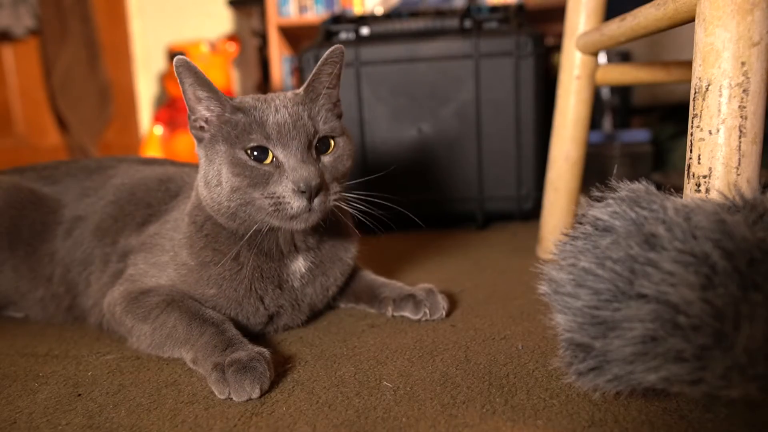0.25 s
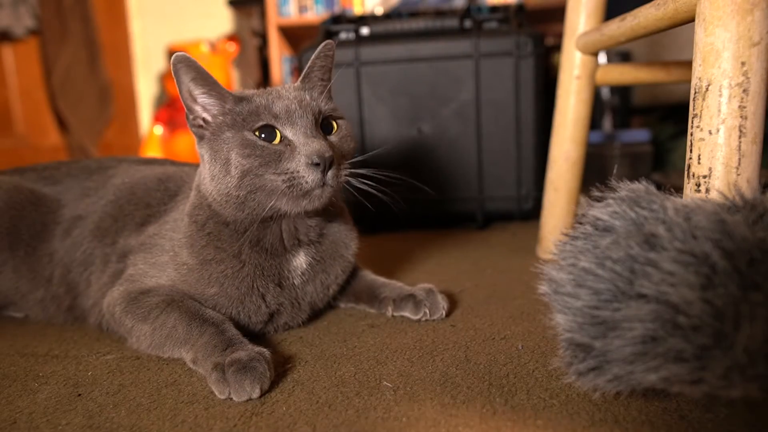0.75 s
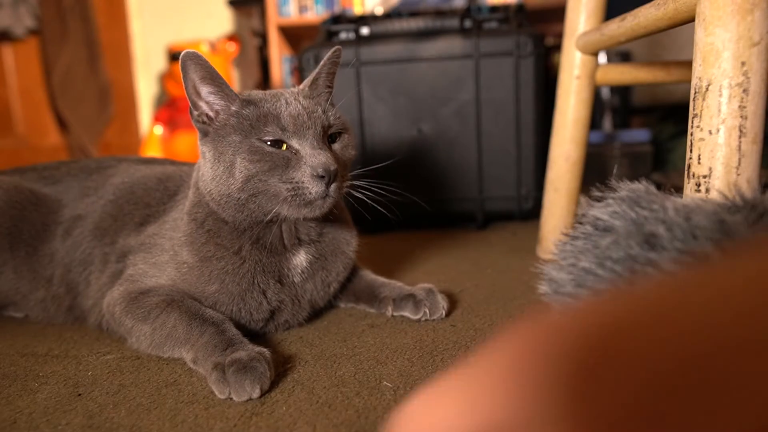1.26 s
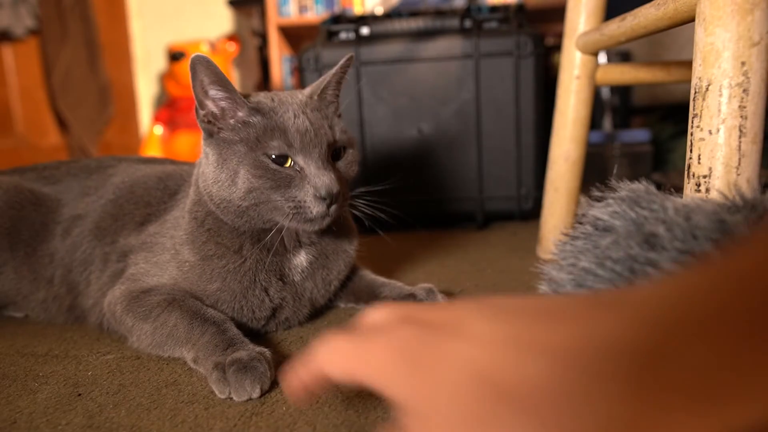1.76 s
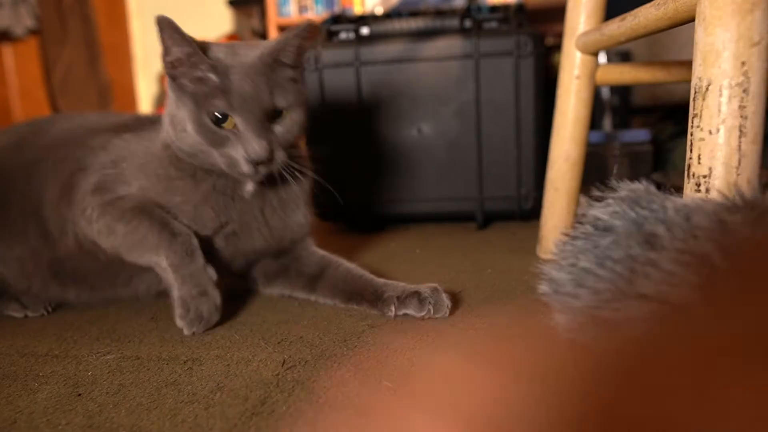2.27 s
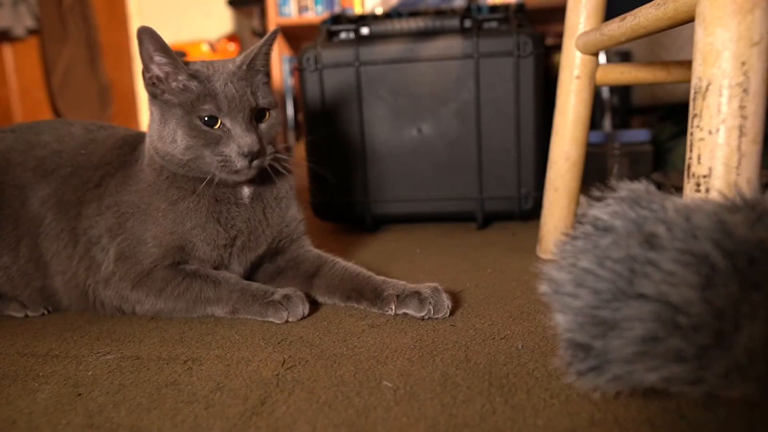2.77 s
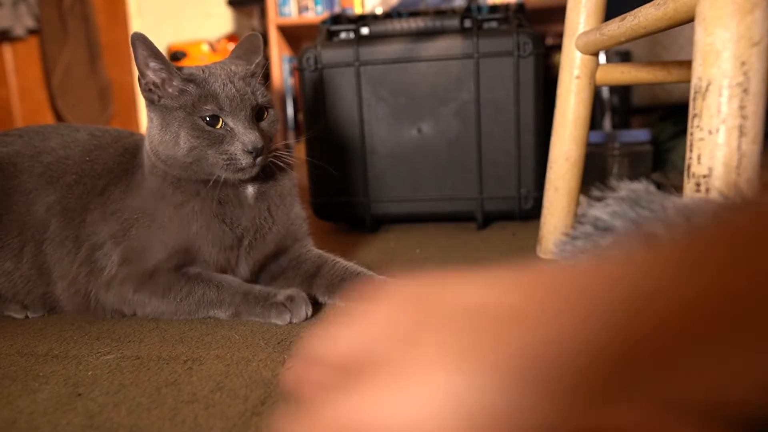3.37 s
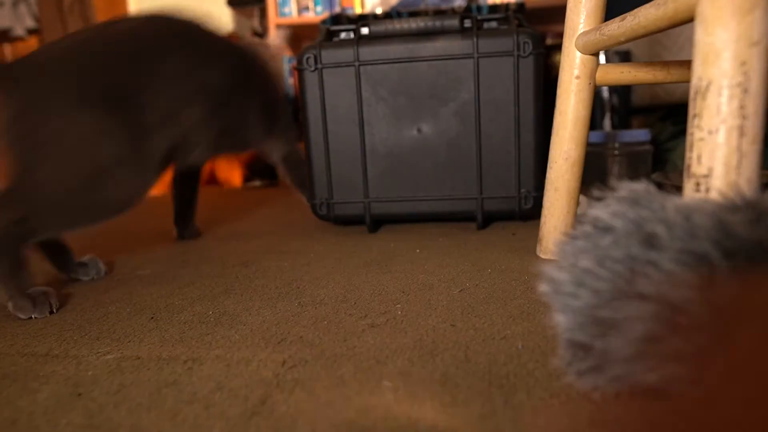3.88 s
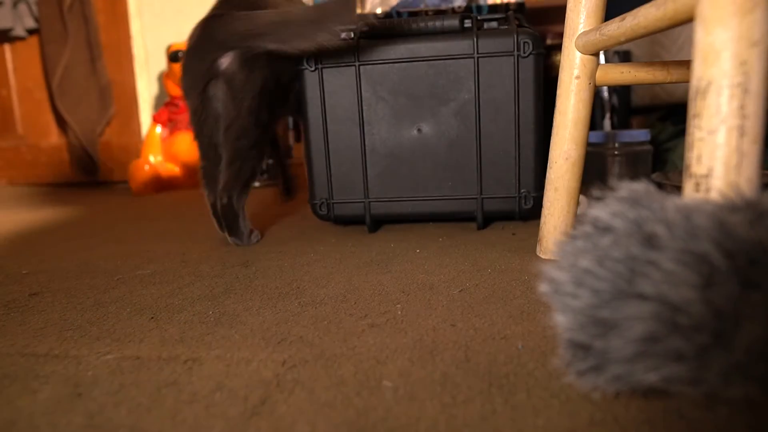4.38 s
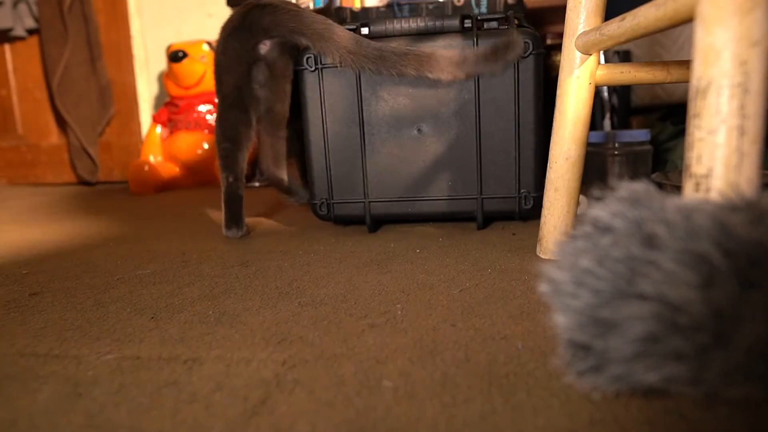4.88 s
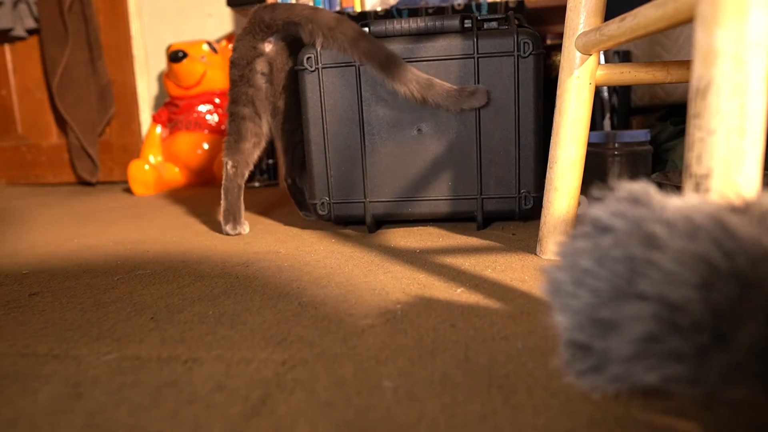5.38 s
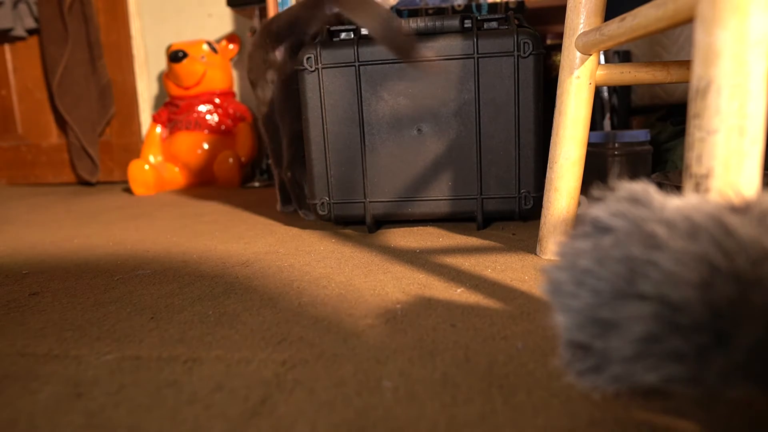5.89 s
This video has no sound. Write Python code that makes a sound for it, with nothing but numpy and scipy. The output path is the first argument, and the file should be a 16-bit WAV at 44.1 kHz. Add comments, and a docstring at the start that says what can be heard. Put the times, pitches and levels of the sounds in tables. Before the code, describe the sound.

A stereo microphone near the floor picks up a quiet carpeted room with faint, steady hiss. For the first second there are light, grainy brushes on the carpet and a couple of tiny ticks. Around 1.5 seconds a hand and a cat's paws rustle a little more, with soft low thumps in the floorboards. From 2 to 2.5 seconds come claw ticks, a falling swish and a soft thud. Louder swishes, ticks and thuds follow at about 3.4 to 3.7 seconds as the cat gets up. After faint shuffling, the busiest stretch runs from 4.6 to 5.3 seconds, with quick brushing steps, sharp little fibre snaps and low rumble as the cat pads away. At about 5.4 seconds the microphone stand takes one dull knock and wobbles briefly. A last soft swish comes on the left at around 6 seconds.

```python
"""A quiet carpeted room, heard by a stereo microphone near the floor. A hand and a cat's paws brush
the carpet in grainy swishes, and its ribs add a band of noise that glides with the stroke's speed.
Claws and caught fibres tick. Paws and palms land with soft thuds, and shifting weight booms in the
floorboards and shakes the microphone, whose stand is knocked once. Room tone and hiss lie under all."""
import sys
import numpy as np
from scipy import signal
from scipy.fft import rfft, irfft, next_fast_len
from scipy.io import wavfile
from scipy.ndimage import map_coordinates

SR = 44100
rng = np.random.default_rng(int(sys.argv[2]) if len(sys.argv) > 2 else 0)


def master(y):
    """Save y as 16-bit WAV."""
    cut = np.clip(np.atleast_2d(y).T, -1, 1)
    pcm = np.round(cut * 32767)  # scale
    wavfile.write(sys.argv[1], SR, pcm.astype(np.int16))


N = 270765

# Brush strokes: (start [s], rise [s], hold [s], pile [dB], loops [dB], fibres [dB], fur [dB],
# pan left [dB])
STROKES = [(.12, 0.086, 0.15, -69, -72, -81, -89, 12), (.56, 0.068, 0.095, -60.5, -67, -79, -91, 6.5),
           (.81, 0.045, .11, -68, -71, -70, -66.5, 9.5), (.87, .02, 0.042, -63, -66.5, -72, -72, 6),
           (1.37, 0.072, 0.1, -65.5, -61, -66, -78, 10), (1.455, .015, .015, -63, -65, -69, -80, 13),
           (1.53, 0.024, 0.09, -62.5, -57.5, -63, -69, 10), (2.03, 0.04, 0.0093, -58.5, -56, -67, -80, 1),
           (2.15, 0.017, .012, -58, -68, -63, -61.5, 1), (2.195, 0.027, 0.049, -60.5, -56, -61.5, -66, 1.5),
           (2.26, 0.071, 0.059, -67, -53.5, -59, -64, 5), (2.36, 0.026, 0.053, -62, -58.5, -58.5, -65, 8),
           (2.44, 0.011, 0.07, -69, -65.5, -63, -73, 9.5), (2.72, 0.082, 0.054, -66.5, -69, -77, -81, -2),
           (2.965, .02, 0.036, -75, -72, -90, -85, -1), (3.34, 0.045, .03, -62, -60.5, -71, -73, -0.5),
           (3.425, 0.016, 0.011, -55.5, -60, -60.5, -67, 1.5), (3.47, .01, 0.024, -60.5, -62, -67, -68, 2),
           (3.555, 0.018, 0.0069, -63.5, -62, -76, -85, -1),
           (3.61, 0.017, .085, -56.5, -57, -61, -65.5, 1.5), (3.635, 0.018, 0.024, -48, -56, -59.5, -72, 2),
           (4.57, 0.05, 0.037, -64, -66.5, -70, -67, -5), (4.66, 0.025, .045, -66, -62, -63, -61, -3.5),
           (4.73, 0.023, 0.033, -52, -54, -63, -64, -1), (4.775, 0.014, 0.05, -55, -55.5, -59.5, -62, -1.5),
           (4.855, 0.0066, 0.0072, -49.5, -63, -60, -72, -1), (4.885, .012, .03, -62, -57, -64, -70, 2),
           (4.945, 0.03, 0.038, -51.5, -61, -63, -64, 2.5), (5.01, 0.01, 0.017, -59, -60, -60, -52.5, -1),
           (5.04, 0.022, .03, -55.5, -70, -64.5, -62, -3),
           (5.09, 0.028, 0.035, -54.5, -59.5, -67, -60.5, -5),
           (5.13, 0.048, 0.029, -61, -53.5, -56, -58, -1.5), (5.29, 0.058, .025, -64, -72, -74, -82, 8),
           (5.8, 0.072, 0.051, -72, -74, -85, -72, -8), (6.0, 0.086, 0.057, -59.5, -62.5, -71, -95, 13.5)]
# Release as the contact lifts: (pile [dB/s], loops [dB/s], fibres [dB/s], fur [dB/s])
STROKE_RELEASE = [500, 600, 600, 600]
# Body of the coarse pile: (frequency [Hz], level [dB])
PILE_EQ = [(350, -51), (600, 1.5), (1200, -2), (2000, -5), (2800, -30.5)]
# Rasp of the tight loops: (frequency [Hz], level [dB])
LOOPS_EQ = [(1600, -4.5), (2300, 2), (3500, -2), (5000, -9.5), (6500, -65)]
# Sizzle of single fibres: (frequency [Hz], level [dB])
FIBRES_EQ = [(3800, -5.5), (5200, -2), (7000, -3.5), (9000, -4.5), (11000, -39)]
# Airy top of the fur: (frequency [Hz], level [dB])
FUR_EQ = [(7500, -45), (9300, 8.5), (12000, 7.5), (15800, -1)]
# Glides across the ribs, one list a stroke: (time [s], rib rate [Hz], level [dB])
RIB_GLIDES = [
    [(.14, 1700, -97), (.165, 1690, -61.5), (.2, 1940, -68), (.25, 1710, -57.5), (.29, 1280, -59.5),
     (.33, 900, -66), (.36, 750, -97)],
    [(2.27, 2610, -84), (2.3, 2350, -53.5), (2.34, 1560, -50.5), (2.385, 1140, -51), (2.42, 815, -55),
     (2.455, 607, -63), (2.48, 500, -95)],
    [(3.61, 1210, -80), (3.64, 1460, -49.5), (3.665, 1650, -46.5), (3.69, 1990, -51.5), (3.72, 1700, -73),
     (3.74, 1500, -101)],
    [(6.02, 1100, -76), (6.06, 1300, -61), (6.14, 1430, -51.5)],
]
# Claw and fibre ticks: (time [s], ring [dB], pitch [Hz], snap [dB], snap top [Hz], pan left [dB])
TICKS = [(.064, -51, 960, -52, 4000, 10), (0.867, -51, 1310, -41, 2840, -4),
         (.97, -65, 1500, -54, 2500, -1), (1.476, -54, 900, -42.5, 2730, 4), (1.6, -48, 700, -44, 2800, 2),
         (1.627, -51, 800, -51, 2700, 4), (1.645, -46, 1090, -50, 2760, 1),
         (2.165, -35, 1170, -52, 3280, 0), (2.174, -37, 955, -40, 2140, 0), (2.201, -48, 805, -44, 1500, 0),
         (2.384, -38.5, 590, -46, 2500, -1), (3.445, -55, 600, -41, 1800, -2),
         (3.477, -33.5, 900, -36.5, 3280, -7), (3.622, -45, 915, -49, 3000, 0),
         (3.648, -37, 1770, -39, 2470, -1), (3.662, -38, 520, -46, 2400, 1),
         (4.738, -34, 700, -50, 2400, -7), (4.753, -31, 620, -38, 2900, -6),
         (4.79, -34.5, 583, -42.5, 3400, -9), (4.861, -34, 1260, -41, 2280, 4),
         (4.8845, -34.5, 1600, -35, 5170, 2.5), (5.064, -41.5, 1160, -53, 2100, 9),
         (5.13, -37, 730, -47, 1500, -7), (5.152, -36, 533, -46, 1500, -13),
         (5.195, -43, 1080, -50, 3500, -14), (5.284, -49, 600, -65, 1500, -13),
         (5.355, -47, 526, -66, 1200, 12), (5.52, -46.5, 648, -68, 1500, -13)]
# Stereo image through the air: (frequency [Hz], left-right correlation [-1..1])
AIR_IMAGE = [(640, 0.85), (1500, 0.64), (3500, 0.53), (8000, 0.55), (15000, -0.69)]

# Weight shifts: (start [s], rise [s], hold [s], press [dB], main board [dB], other boards [dB],
# shake [dB], pan left [dB])
SHIFTS = [(0.14, 0.035, 0.075, -63.5, -59, -56, -51.5, 4), (0.299, 0.016, 0.015, -57.5, -53, -55, -47, 5),
          (0.465, 0.037, 0.015, -68, -71, -57, -65, 2), (0.573, .02, .03, -59, -70, -70, -63, -3),
          (0.637, 0.034, 0.063, -55.5, -55.5, -48, -61, 2.5),
          (0.861, 0.063, 0.011, -51.5, -53.5, -46.5, -49, -2.5),
          (1.368, 0.016, 0.036, -51.5, -40, -55, -49, 0.5),
          (1.459, 0.023, 0.029, -49.5, -52, -56, -55, -3.5),
          (1.517, 0.036, 0.082, -47, -50.5, -49.5, -60, -0.5), (1.57, 0.019, 0.022, -59, -43, -60, -62, 3),
          (1.635, 0.023, 0.036, -70, -52, -53.5, -65, -1), (2.024, 0.045, 0.024, -57, -59, -52, -52, 1.5),
          (2.15, 0.029, 0.055, -53.5, -49.5, -47, -48, -0.5),
          (2.267, 0.045, 0.053, -53, -52, -41.5, -46.5, 3.5), (2.397, .02, 0.043, -54.5, -61, -56, -51, 2),
          (2.478, .02, 0.011, -58.5, -65, -50, -62, -1), (3.374, 0.1, 0.01, -49.5, -50.5, -45, -43, 1),
          (3.559, 0.033, .02, -64, -60, -44.5, -47, 5), (3.63, 0.032, 0.042, -47.5, -49, -48, -42, -2.5),
          (3.716, 0.033, 0.051, -71, -56.5, -64, -47, -3), (4.13, 0.053, 0.046, -58.5, -68, -45, -58, 2.5),
          (4.277, 0.037, 0.026, -74, -66, -63, -56, -1), (4.41, .03, 0.046, -68, -65, -58, -55.5, -2),
          (4.661, 0.1, 0.076, -44.5, -60, -61, -69, -6), (4.849, 0.017, 0.016, -41, -62, -63, -48.5, 2),
          (4.887, .015, 0.042, -49.5, -70, -55, -41, -2), (4.958, 0.026, 0.064, -47, -50.5, -55, -48, -4),
          (5.045, 0.029, 0.013, -47, -55, -52, -55, -7), (5.106, 0.024, 0.07, -42.5, -51, -48, -48, -6.5),
          (5.269, 0.036, 0.032, -60, -55, -40.5, -40.5, 3.5), (5.336, 0.011, 0.022, -50, -49, -45, -39, 4),
          (5.378, .015, .015, -58, -50, -57, -38.5, 0), (5.42, .03, 0.059, -69, -73, -68, -44, 9),
          (5.545, 0.038, .35, -66.5, -78, -81, -50, 5), (5.824, 0.055, .1, -55.5, -69, -72, -58, -0.5),
          (6.0, 0.071, 0.089, -52, -70, -62.5, -59, 0.5)]
# Release as the floor settles: (press [dB/s], main board [dB/s], other boards [dB/s], shake [dB/s])
SHIFT_RELEASE = [350, 213, 236, 200]
# Muffled press of pads into the pile: (frequency [Hz], level [dB])
PRESS_EQ = [(150, -17), (200, 5.5), (300, 0), (450, 0.5), (650, -11), (900, -13), (1250, -37)]
# Strongest floor mode: (pitch [Hz], width [Hz], level [dB])
MAIN_BOARD = [(127.03, 10.1, 0)]
# Other floor modes: (pitch [Hz], width [Hz], level [dB])
OTHER_BOARDS = [(88.2, 18.2, 5), (173.8, 21.7, -0.5)]
# Rumble of the shaken microphone: (frequency [Hz], level [dB])
SHAKE_EQ = [(8, 10.5), (20, 5.5), (45, 5.5), (70, -5.5), (100, -46.5)]
# Stereo image through the boards: (frequency [Hz], left-right correlation [-1..1])
FLOOR_IMAGE = [(25, -0.23), (60, 0.13), (100, -0.07), (140, 0.63), (200, -0.65), (245, 0.39), (290, 0.39),
               (380, 0.012), (650, 0.66)]
# Soft landings: (time [s], level [dB], pitch [Hz], t60 [s])
THUDS = [(1.359, -43.5, 147, 0.16), (1.655, -45.5, 126, 0.21), (2.28, -32.5, 139, 0.073),
         (2.508, -37, 131, 0.038), (3.445, -30, 151, 0.046), (3.478, -32.5, 266, 0.097),
         (3.658, -28.5, 171, 0.066), (4.169, -42, 101, 0.17), (5.197, -27, 208, 0.03),
         (5.35, -29, 64, 0.066), (5.355, -27.5, 192, 0.032)]

# Faint restless shuffling between gestures: (time [s], level [dB])
SHUFFLE = [(0, -67), (.4, -65), (.8, -66), (1.2, -65.5), (1.75, -65), (2.0, -64), (2.6, -64), (2.9, -64.5),
           (3.2, -64), (3.75, -64), (4.0, -60.5), (4.3, -56.5), (4.6, -58.5), (5.25, -57.5), (5.5, -63.5),
           (5.7, -62.5), (5.95, -61), (6.14, -70)]
# Shuffling's send to the brush layers: (pile [dB], loops [dB], fibres [dB], fur [dB])
SHUFFLE_TO_BRUSH = [-7.5, -12.5, -18.5, -18]
# Shuffling's send to the floor: (press [dB], main board [dB], other boards [dB], shake [dB])
SHUFFLE_TO_FLOOR = [-0.58, -4.5, -3.1, 2.2]

# Envelope of the microphone's sway: (time [s], level [dB])
SWAY_LEVEL = [(0, -72), (.3, -61), (.5, -69), (.93, -54), (1.05, -70), (1.33, -66), (1.4, -65), (1.8, -66),
              (2.55, -100), (3.35, -78), (3.48, -69), (3.85, -69), (4.2, -61), (4.8, -59), (5.05, -45),
              (5.28, -61), (5.37, -58), (5.6, -65), (6.14, -58)]
# Sub-bass of that sway: (frequency [Hz], level [dB])
SWAY_EQ = [(8, -10), (25, 14), (60, 5), (85, -13), (102, -0.5), (120, -10), (150, -30)]
# Free swings of the knocked stand: (pitch [Hz], level [dB], t60 [s])
STAND_MODES = [(33, -25, .3), (24.5, -33, .95)]
# Decay of the wall reflections: (frequency [Hz], t60 [s])
WALL_DECAY = [(200, 0.1), (2000, 0.029), (10000, 0.055)]
# Room tone and hiss: (frequency [Hz], level [dB])
ROOM_EQ = [(12, -66), (20, -9.5), (58, -2), (81, -5.5), (119, -4.5), (192, -10.5), (335, -19), (456, -24),
           (713, -19), (843, -20.5), (1050, -24), (4370, -27.5), (15800, -30.5)]
# Stereo image of the room tone: (frequency [Hz], left-right correlation [-1..1])
ROOM_IMAGE = [(60, 0.52), (240, 0.24), (950, -0.25), (3770, -0.11), (15000, 0.097)]

OPPOSITE = np.array([[1], [-1]])  # left and right in opposite polarity


def strokes():
    """Skin and fur drag over the carpet: pile, loops, fibres and fur each hiss in their own range."""
    gains = gestures(STROKES, STROKE_RELEASE, SHUFFLE_TO_BRUSH, swell_db=11, sag_db_per_s=9)
    catch = amp(0.79 * wobble(240))  # fibres catch and slip together
    return sum(gain * spread(catch * grainy(500, depth_db=1.0), eq(colour), AIR_IMAGE)
               for gain, colour in zip(gains, (PILE_EQ, LOOPS_EQ, FIBRES_EQ, FUR_EQ)))


def ribs(width_octaves=0.45):
    """Ribs passing under a stroke sound a narrow band that follows its speed."""
    rib_hz, rib_db = curves(sum(RIB_GLIDES, []))
    friction = spread(grainy(200, depth_db=2.0), np.ones_like, AIR_IMAGE)
    hz, t, spectrum = signal.stft(friction, SR, nperseg=512)
    octaves = np.log2((hz[:, None] + 1) / np.interp(t, np.arange(N) / SR, rib_hz))
    band = np.exp(-(octaves / width_octaves) ** 2) / np.sqrt(hz[:, None] + 1)
    glide = signal.istft(spectrum * band, SR, nperseg=512)[1][:, :N]
    return panned(5.0)[:, None] * amp(rib_db) * unit(glide)


def ticks(ring_t60_cycles=15.5, snap_t60_s=0.024, click_gain=1.9):
    """A caught loop of carpet lets go: a short ring and a sharp broad snap."""
    out, t = np.zeros((2, N + SR)), np.arange(SR // 20) / SR
    for start, ring_db, hz, snap_db, top_hz, pan_db in TICKS:
        ring = amp(ring_db - 60 * t * hz / ring_t60_cycles) * np.sin(2 * np.pi * hz * t)
        burst = amp(-60 * t / snap_t60_s) * rng.standard_normal(len(t))
        band = signal.butter(4, [600, top_hz], "bandpass", fs=SR, output="sos")
        crackle = signal.sosfilt(band, burst + click_gain * (t == 0))
        snap = amp(snap_db) * crackle / np.abs(crackle).max()
        out[:, round(start * SR):][:, :len(t)] += panned(pan_db)[:, None] * (ring + snap)
    return out[:, :N]


def thuds(attack_s=0.00076, phase_rad=-0.58):
    """A paw or palm lands: one low push that rings briefly in the boards."""
    out, t = np.zeros((2, N + SR)), np.arange(SR // 2) / SR
    attack = 1 - np.exp(-t / attack_s)
    for start, db, hz, t60 in THUDS:
        tone = np.sin(2 * np.pi * hz * t + phase_rad * OPPOSITE)  # each capsule gets its own phase
        out[:, round(start * SR):][:, :len(t)] += amp(db - 60 * t / t60) * attack * tone
    return out[:, :N]


def weight_shifts(left_lead_s=7e-5):
    """Shifting weight presses the pile, sets the boards booming and shakes the capsules."""
    press = spread(grainy(90, depth_db=2.0), eq(PRESS_EQ), FLOOR_IMAGE)
    hum = spread(rng.standard_normal((2, N)), resonances(MAIN_BOARD), image=[(125, 0.38)])
    hum_envelope = np.abs(signal.hilbert(hum.mean(0)))
    hum = unit(hum / (hum_envelope + 1.44))  # soft compression: a driven board holds its level
    boom = spread(grainy(30, depth_db=2.0), resonances(OTHER_BOARDS), FLOOR_IMAGE)
    shake = spread(rng.standard_normal((2, N)), eq(SHAKE_EQ), FLOOR_IMAGE)
    gains = gestures(SHIFTS, SHIFT_RELEASE, SHUFFLE_TO_FLOOR, swell_db=12.5, sag_db_per_s=17.5)
    floor = sum(gain * layer for gain, layer in zip(gains, (press, hum, boom, shake)))
    # sound in the boards reaches the left capsule first
    return filtered(floor, lambda hz: np.exp(1j * np.pi * hz * left_lead_s * OPPOSITE))


def microphone_rocking(knock_s=5.357):
    """The stand sways, pushing one capsule and pulling the other, and swings out after a knock."""
    sway = unit(filtered(rng.standard_normal(N), eq(SWAY_EQ)))
    t = np.clip(np.arange(N) / SR - knock_s, 0, None)
    swing = sum(amp(db - 60 * t / t60) * np.sin(2 * np.pi * hz * t) for hz, db, t60 in STAND_MODES)
    return (amp(curves(SWAY_LEVEL)[0]) * sway + swing) * OPPOSITE


def walls(x, predelay_samples=300):
    """The room's short reverb; each frequency dies at its own speed."""
    hz, t, spectrum = signal.stft(rng.standard_normal((2, SR // 3)), SR, nperseg=256)
    decay = amp(-60 * t / along(WALL_DECAY, hz)[:, None])
    tail = signal.istft(spectrum * decay, SR, nperseg=256)[1]
    delayed = np.pad(x, ((0, 0), (predelay_samples, 0)))
    return signal.fftconvolve(delayed, tail / np.linalg.norm(tail[0]), axes=1)[:, :N]


def room_tone(level_db=-60.5):
    """A steady bed of air and microphone hiss."""
    return amp(level_db) * spread(rng.standard_normal((2, N)), eq(ROOM_EQ), ROOM_IMAGE)


def gestures(rows, releases, shuffle_sends, swell_db, sag_db_per_s):
    """Stereo envelope of each layer: events swell, sag and die away over the faint shuffling."""
    hop = 64
    t = np.arange(0, N, hop) / SR
    start, rise, hold, *levels_db, pan_db = np.transpose(rows)[..., None]
    attack_db = -swell_db * np.clip(1 - (t - start) / rise, 0, None)
    sag_db = sag_db_per_s * np.clip(t - start - rise, 0, None)
    released_s = np.clip(t - start - rise - hold, 0, None)
    shuffle_db = np.interp(t, *np.transpose(SHUFFLE)) + 0.86 * wobble(12)[::hop]
    gains = []
    for db, release, send_db in zip(levels_db, releases, shuffle_sends):
        events = amp(db + attack_db - sag_db - release * released_s) * panned(pan_db)
        shuffle = amp(shuffle_db + send_db) * panned(0.5)[:, None]
        envelope = np.sqrt(np.sum(events ** 2, axis=1) + shuffle ** 2)
        gains.append(np.array([np.interp(np.arange(N) / SR, t, side) for side in envelope]))
    return gains


def grainy(rate, depth_db):
    """Two noises broken into the same grains: many small fibres catch and let go."""
    return rng.standard_normal((2, N)) * amp(depth_db * wobble(rate))


def wobble(rate):
    """A smooth random curve, rate knots a second."""
    return map_coordinates(rng.standard_normal(int(N * rate / SR) + 4), [np.arange(N) * rate / SR])


def spread(pair, response, image):
    """Two unrelated signals, coloured and mixed as mid and side to the given stereo image, rms 1."""
    def mid_side(hz):
        angle = np.arccos(np.clip(along(image, hz), -1, 1)) / 2
        return response(hz) * [np.cos(angle), np.sin(angle)]
    mid, side = filtered(pair, mid_side)
    return unit(np.array([mid + side, mid - side]))


def resonances(modes):
    """Response of a set of modes in alternating polarity, applied twice for steep flanks."""
    return lambda hz: sum(
        (-1) ** k * amp(db / 2) * 1j * hz * width / (pitch ** 2 - hz ** 2 + 1j * hz * width)
        for k, (pitch, width, db) in enumerate(modes)) ** 2


def eq(points):
    """Response of an EQ curve drawn through (frequency [Hz], level [dB]) points."""
    return lambda hz: amp(along(points, hz))


def filtered(x, response):
    """x through a complex frequency response."""
    size = next_fast_len(N + SR // 2)
    return irfft(rfft(x, size) * response(np.fft.rfftfreq(size, 1 / SR)), size)[..., :N]


def along(points, hz):
    """Breakpoints joined on a log frequency axis."""
    knots_hz, values = np.transpose(points)
    return np.interp(np.log(hz + 1), np.log(knots_hz + 1), values)


def curves(rows):
    """One automation curve for each column after the time."""
    times, *columns = np.transpose(rows)
    return [np.interp(np.arange(N) / SR, times, column) for column in columns]


def panned(pan_db):
    """Left and right gains; positive leans left."""
    return amp(np.array([pan_db / 2, -pan_db / 2]))


def amp(db):
    """Decibels to gain."""
    return 10 ** (np.asarray(db) / 20)


def unit(x):
    """Scaled to rms 1."""
    return x / np.sqrt(np.mean(x ** 2) + 1e-20)


def scene():
    """The mix at floor level; only ticks and thuds feed the reverb."""
    hits = ticks() + thuds()
    reverb = amp(-9) * walls(hits)
    return hits + reverb + strokes() + ribs() + weight_shifts() + microphone_rocking() + room_tone()


def record(dry):
    """A brick-wall low-pass trims the very top."""
    return filtered(dry, lambda hz: hz < 15750)


dry = scene()
out = record(dry)
master(out)
```